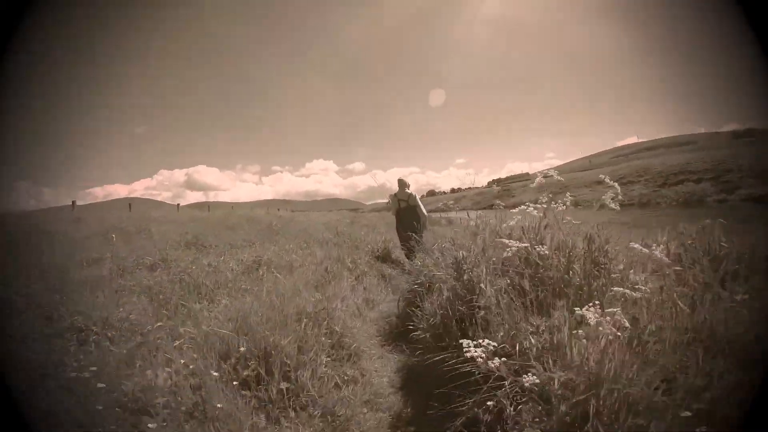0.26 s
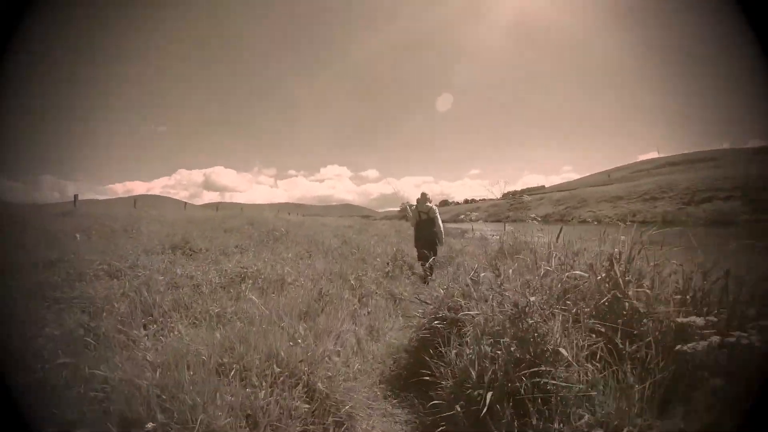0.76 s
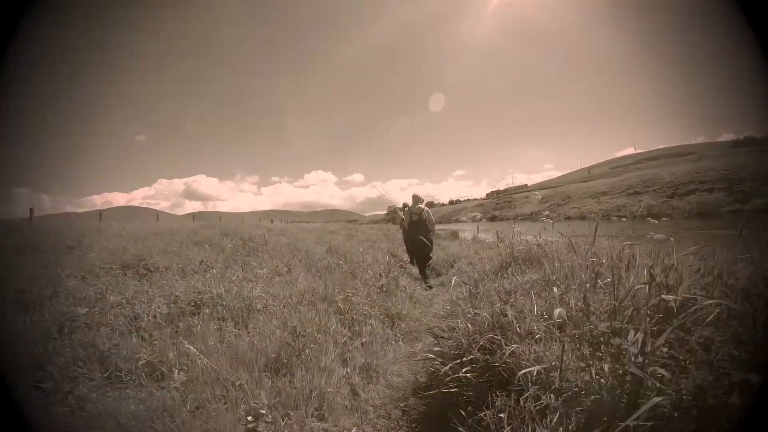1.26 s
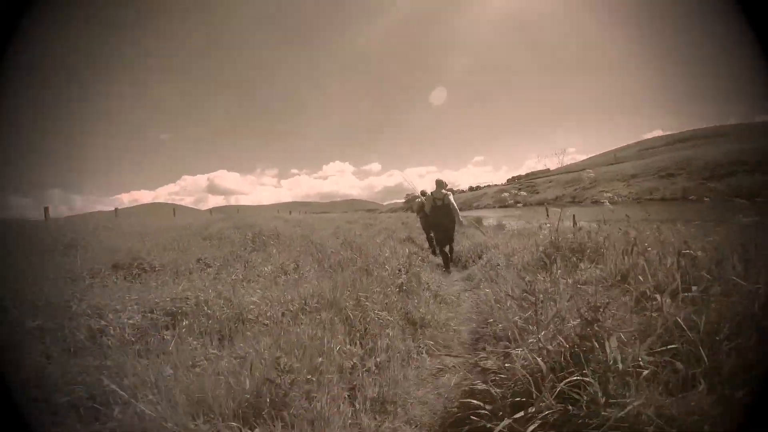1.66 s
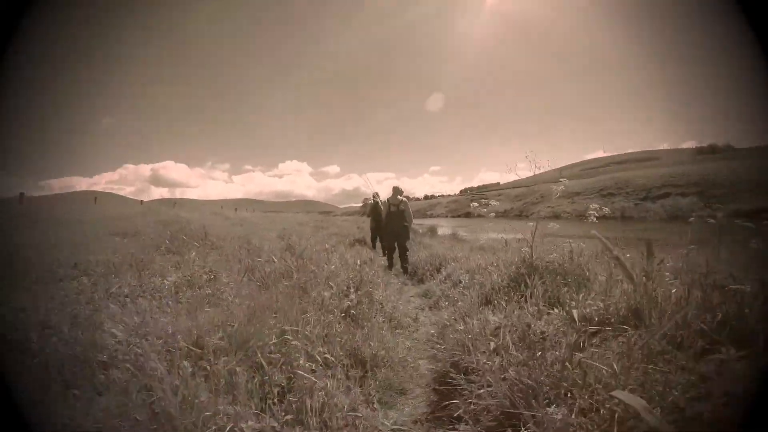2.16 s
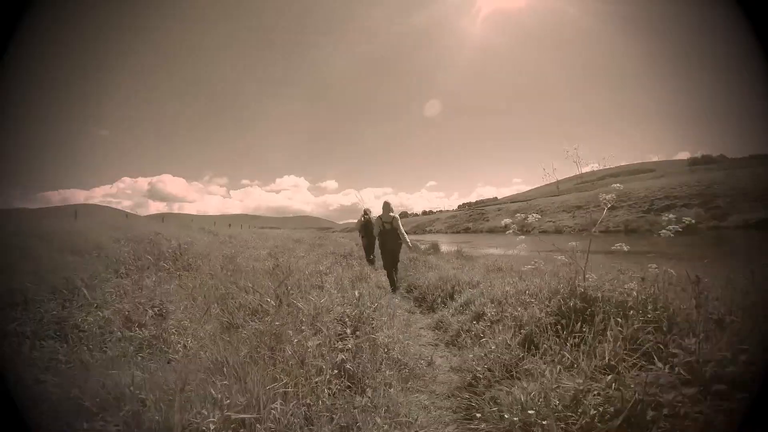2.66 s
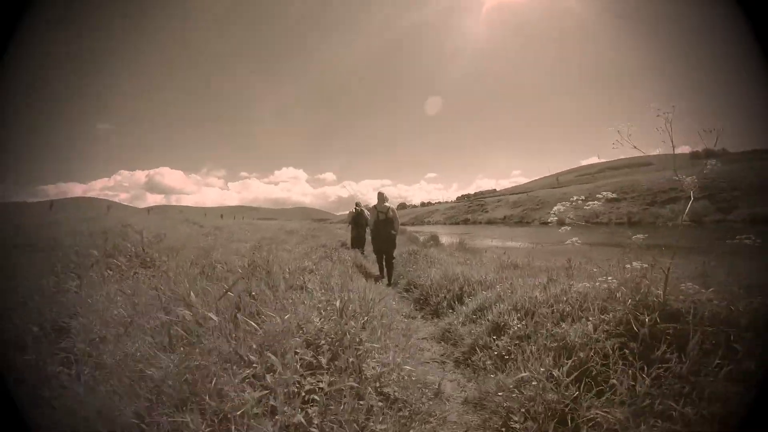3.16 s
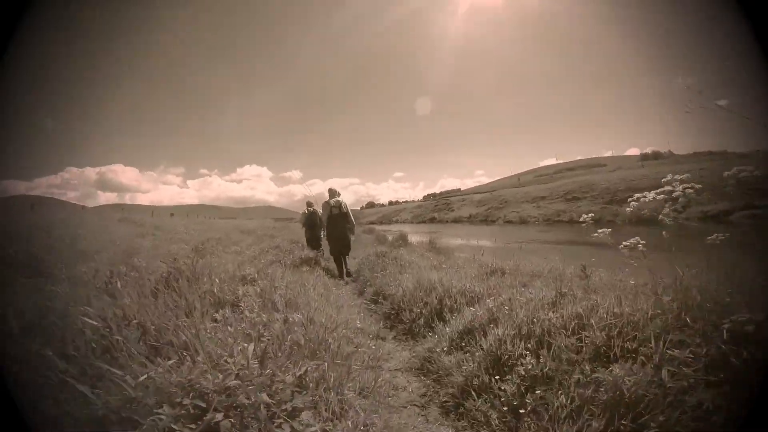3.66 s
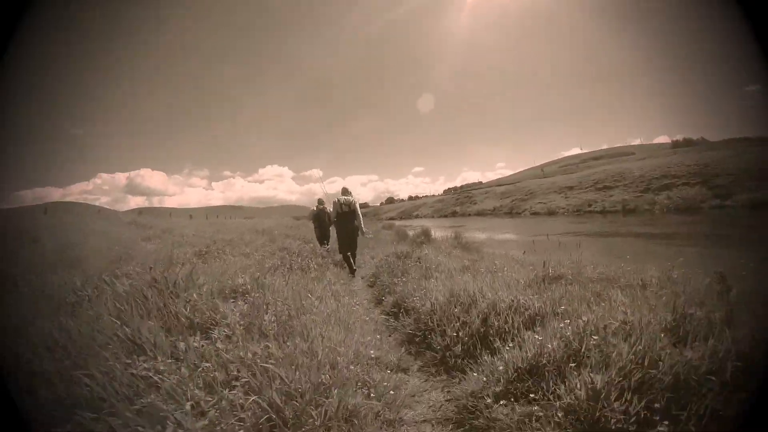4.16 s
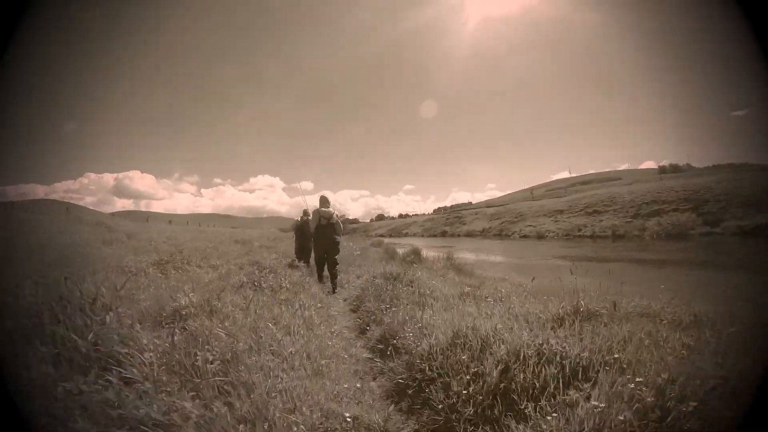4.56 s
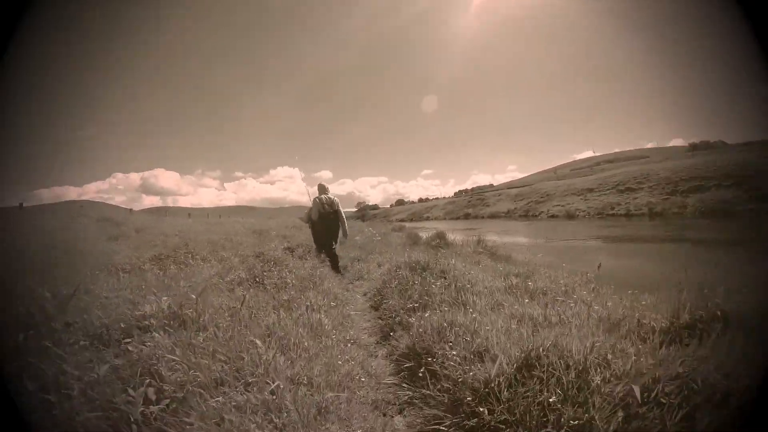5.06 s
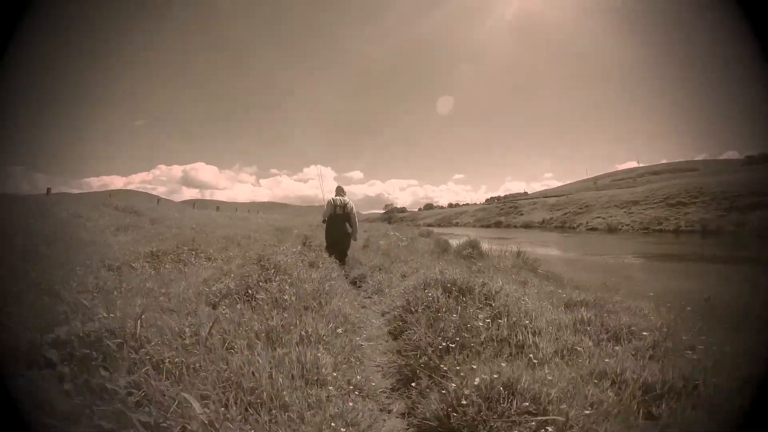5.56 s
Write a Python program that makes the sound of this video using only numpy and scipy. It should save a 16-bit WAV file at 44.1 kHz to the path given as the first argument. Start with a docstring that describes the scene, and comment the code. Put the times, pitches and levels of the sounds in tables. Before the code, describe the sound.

A handheld camera microphone moves along a grassy path. Deep light wind and hollow case bumps run under crisp grassy brushing and muffled footfalls. About nine brief, nearly pure bird whistles are spread through the six seconds, many opened by a quick peep, with only a faint open-air echo. Far birds are barely audible; a few taps and squeaks come early, over thin electronic hiss.

```python
"""Low wind rumble and soft bumps of a hand on a camera come first; then a step lands and a bird whistles.
The bird's near-pure tone flips from a low note to a high one and falls back, with faint echoes.
On this walk through long grass, grains of noise swish past the legs, and steps jolt the camera.
Knocks ring the case's modes, and rubs are noise with a squeak and a scuff in it.
Filtered noise rustles in the field, far birds are blurred tones, and the electronics hiss and whine."""
import sys
import numpy as np
from scipy import signal
from scipy.fft import rfft, irfft
from scipy.io import wavfile

SR = 44100
rng = np.random.default_rng(int(sys.argv[2]) if len(sys.argv) > 2 else 0)


def file_out(sig):
    """Save sig as 16-bit WAV at sys.argv[1]."""
    # one column per channel
    cols = np.atleast_2d(sig).T
    # limit, then scale
    lim = np.clip(cols, -1, 1)
    pcm = np.round(lim * 32767).astype(np.int16)
    wavfile.write(sys.argv[1], SR, pcm)


N = 256033
TIME = np.arange(N) / SR   # seconds

# the bird's low note (Hz) and how it curls upward just before the flip (Hz, s)
LOW_HZ, RISE_HZ, RISE_S = 2485, 309, 0.0112
# hollow ringing modes of the camera's case: pitch_hz [Hz], level_db [dB], t60_s [s to die away by 60 dB]
HOLLOW_MODES = [(220, -1, 0.088), (286, -39, 0.054), (122, -19, 0.055)]


def from_db(db):
    """Turn decibels into a plain factor."""
    return 10 ** (np.asarray(db) / 20)


def rms_one(x):
    """Scale a sound to an average (rms) strength of 1."""
    return x / np.sqrt(np.mean(x ** 2) + 1e-20)


def ease(t):
    """A smooth step from 0 to 1 around t = 0."""
    return .5 + .5 * np.tanh(t / 2)


def swell(s, length):
    """A bell-shaped rise and fall around a moment."""
    return np.exp(-.5 * ((TIME - s) / length) ** 2)


def swells(base, rows):
    """A base level with swells (start_s, level_db, length_s) on top, added in power."""
    bells = sum((from_db(db) * swell(s, length)) ** 2 for s, db, length in rows)
    return np.sqrt(base ** 2 + bells)


def level_curve(rows):
    """Join points (start_s, level_db) with straight lines, one value per sample."""
    s, db = np.transpose(rows)
    return np.interp(TIME, s, db)


def drift(rate_hz):
    """Slow random wander with a spread of 1: noise smoothed twice, at one fortieth of the sample rate."""
    pole = np.exp(-2 * np.pi * rate_hz * 40 / SR)
    noise = rng.standard_normal(N // 40 + 2002)
    slow = signal.lfilter([1], [1, -2 * pole, pole * pole], noise)[2000:]   # skip the filter's start-up
    return np.interp(np.arange(N) / 40, np.arange(len(slow)), rms_one(slow))


def colour(x, spectrum):
    """Shape x with a spectrum (pitch_hz, level_db) that falls steeply beyond its ends; rms 1."""
    hz, db = np.transpose(spectrum)
    f = np.maximum(np.fft.rfftfreq(N, 1 / SR), 1)
    skirts = np.minimum(f / hz[0], 1) ** 3 * np.minimum(hz[-1] / f, 1) ** 3
    shape = from_db(np.interp(np.log(f), np.log(hz), db))
    return rms_one(irfft(rfft(x) * skirts * shape, N))


def clicks(times, db):
    """Single impulses at the given moments."""
    out = np.zeros(N)
    out[(np.asarray(times) * SR).astype(int)] = from_db(db)
    return out


def ring(x, modes):
    """Each mode is a resonator that a click sets ringing at its own pitch, until it dies away."""
    out = 0
    for hz, db, t60 in modes:
        decay = from_db(-60 / (t60 * SR))
        turn = 2 * np.pi * hz / SR
        feedback = [1, -2 * decay * np.cos(turn), decay * decay]
        out = out + from_db(db) * signal.lfilter([0, np.sin(turn)], feedback, x + 1e-18)
    return out


def grains(per_s, spread_db):
    """Random tiny contacts, a few much stronger than the rest; rms 1."""
    strength_db = spread_db * np.minimum(rng.exponential(1, N), 5)
    sizes = from_db(strength_db) * rng.choice([-1, 1], N)
    return rms_one(sizes * (rng.random(N) < per_s / SR))


def bird(waver=0.0028, flutter_db=1.48, edge_s=0.00289, third_db=-20, leak=0.1, steady_db=-48):
    """A nearly pure whistle; the throat passes overtones well on the low notes and only leaks them higher up."""
    # whistles: flip_s, low_note_s, high_note_s, fall_s [s], top_hz, sag_hz, arch_hz [Hz],
    # low_db, high_db, late_fade_db (negative grows), fall_db [dB, before carry],
    # octave_start_db, octave_end_db [dB against the main tone, before the throat]
    whistle_rows = [(.554, 0.023, 0.044, 0.0073, 3280, 330, 108, -41.5, -50, 4, -55, -32, -18),
                    (0.947, .016, .078, 0.0071, 3287, 384, 12, -43.5, -50, -9, -48, -26, -13),
                    (1.550, 0.055, .071, .020, 3240, 270, 37, -57.5, -54.5, -6, -51.5, -15, -12),
                    (2.763, .018, 0.041, 0.01, 3310, 320, 96, -54, -57.5, -2, -63, -14, -3.5),
                    (3.179, 0.0079, 0.12, 0.0078, 3270, 45, -91, -49, -54.5, 1, -62, -16, -2),
                    (3.621, .012, 0.17, 0.018, 3180, 60, 37.5, -58, -65, 4, -53, -19, -22),
                    (4.096, 0.018, .096, 0.021, 3170, 212, 85, -59.5, -72, -20, -45.5, -5, -20),
                    (4.64, 0.019, 0.067, 0.0225, 3244, 342, 98, -49, -43, 19, -46, -6, -18),
                    (5.035, .030, 0.1, 0.088, 3150, 110, 49.5, -53, -53, 6, -59, -9.5, -8)]
    # quick peeps that open most calls: middle_s, length_s [s], top_hz [Hz],
    # level_db [dB, before carry], octave_db [dB against the main tone, before the throat]
    peep_rows = [(0.909, 0.032, 2650, -45.5, -26), (3.148, .028, 2900, -49.5, -25),
                 (3.569, 0.029, 2990, -52.5, -18), (4.003, .030, 3150, -59.5, -10),
                 (4.61, 0.0334, 2830, -47.5, -0.5), (4.986, 0.037, 3120, -48.5, -19)]
    # how well each pitch carries: pitch_hz [Hz], level_db [dB]
    carry = [(2400, -10), (2500, -5), (2650, 1), (2790, -7.5), (2920, -6), (3060, 0.5), (3300, 0.5)]
    octave_hz, octave_width_hz = 4820, 720   # where the throat lets the octave through
    out = np.zeros(N)
    wander = 1 + waver * drift(100)
    flutter = flutter_db * drift(72)
    notes = [whistle(*row) for row in whistle_rows] + [peep(*row) for row in peep_rows]
    for start, end, hz, db, octave_db in notes:
        gate = np.clip(np.minimum(TIME - start, end - TIME) / edge_s + .5, 0, 1)
        on = gate > 0
        hz = hz[on]
        db = db[on] + np.interp(hz, *np.transpose(carry))
        unsteady = np.clip((steady_db - db) / 5, 1, 4)   # soft notes flutter more
        phase = 2 * np.pi * np.cumsum(hz * wander[on]) / SR
        throat = leak + np.exp(-.5 * ((2 * hz - octave_hz) / octave_width_hz) ** 4)
        overtones = np.sin(2 * phase) + from_db(third_db) * np.sin(3 * phase)
        voice = np.sin(phase) + from_db(octave_db[on]) * throat * overtones
        out[on] += np.sqrt(2) * gate[on] * from_db(db + unsteady * flutter[on]) * voice
    return out


def whistle(flip, low_s, high_s, fall_s, top_hz, sag_hz, arch_hz, low_db, high_db, fade_db, fall_db,
            opening_db, closing_db):
    """A low note flips up, sags along an arch and falls back: start, end, pitch, level and octave level."""
    flip_s, slide_s = .0007, 0.0038   # an abrupt flip and a slower slide back
    end_hz, sink_hz = 2726, 230       # the slide lands here and sinks on by this much
    fade_shape = 4.4                  # the high note holds its level, then changes late
    fade_db_per_s = 110               # dying away after the slide
    t = TIME - flip
    held = np.clip(t / high_s, 0, 1)
    falling_s = np.clip(t - high_s, 0, fall_s)
    up, down = ease(t / flip_s), ease((t - high_s) / slide_s)
    low, high = 1 - up, up - down   # how much of each note sounds
    low_hz = LOW_HZ + RISE_HZ * np.exp(np.minimum(t, 0) / RISE_S)
    high_hz = top_hz - sag_hz * held + arch_hz * np.sin(np.pi * held)
    last_hz = end_hz - sink_hz * falling_s / fall_s
    hz = low * low_hz + high * high_hz + down * last_hz
    held_db = high_db - fade_db * held ** fade_shape
    last_db = fall_db - fade_db_per_s * falling_s
    db = low * low_db + high * held_db + down * last_db
    octave_db = opening_db + (closing_db - opening_db) * held
    return flip - low_s, flip + high_s + fall_s, hz, db, octave_db


def peep(s, length, top_hz, db, octave_db, flatness=3.3, width=.3, edge_db=5.0):
    """A quick hop from the low note and back, loudest on top: start, end, pitch, level and octave level."""
    hop = np.exp(-np.abs((TIME - s) / (width * length)) ** flatness)
    hz = LOW_HZ + (top_hz - LOW_HZ) * hop
    return s - length / 2, s + length / 2, hz, db - edge_db * (1 - hop), np.full(N, octave_db)


def meadow(x, scatter_db=-19, t60=0.49):
    """A few faint delayed copies and a thin, dying noise tail scattered by the hillside."""
    # reflections from the ground and the slope: delay_s [s], level_db [dB]
    echo_rows = [(0.024, -29), (.047, -22), (.074, -42), (.112, -57)]
    echoes = sum(from_db(db) * np.interp(TIME - delay, TIME, x, left=0) for delay, db in echo_rows)
    tail = rng.standard_normal(SR) * from_db(-60 * TIME[:SR] / t60)
    scattered = signal.fftconvolve(x, tail / np.linalg.norm(tail))[:N]
    return x + echoes + from_db(scatter_db) * scattered


def footfalls(sway_hz=14, sway_s=0.036, lag_s=0.019, crunch_s=0.025):
    """A step thuds through the camera's case; just after, the camera sways and the turf is pressed."""
    # footfalls: start_s [s], sway_db, thud_db (strength of the click), crunch_db [dB]
    step_rows = [(.497, -27.5, -38, -56), (1.669, -40, -52, -68), (2.31, -60, -42.5, -85),
                 (2.945, -23.5, -31, -66), (3.472, -32.5, -52, -56.5), (4.085, -28, -30, -58.5),
                 (4.598, -36, -66, -63), (5.189, -26, -37, -60.5)]
    turf = colour(grains(per_s=3500, spread_db=5.5),
                  [(120, 18), (300, 11.0), (500, 8.5), (900, 17.5), (1400, -36), (3000, 0.5)])
    out = np.zeros(N)
    for s, sway_db, _, crunch_db in step_rows:
        sway = np.cos(2 * np.pi * sway_hz * (TIME - s - lag_s))
        out += from_db(sway_db) * swell(s + lag_s, sway_s) * sway
        out += from_db(crunch_db) * swell(s + lag_s, crunch_s) * turf
    s, _, thud_db, _ = np.transpose(step_rows)
    return out + ring(clicks(s, thud_db), HOLLOW_MODES)


def grass(swish_db=-3.5, flick_db=1.5, clump_db=1.8):
    """Blades brush the legs in dense clumps that swell with each sweep; stems flick past more coarsely."""
    # sweeps of the legs: middle_s [s], level_db [dB, before swish_db and clumps], length_s [s]
    sweep_rows = [(.34, -58, 0.047), (0.617, -58, 0.059), (0.966, -65, 0.061), (1.06, -55.5, 0.02),
                  (1.51, -62.5, .05), (1.82, -62.5, 0.028), (2.555, -60, 0.095), (2.686, -55, 0.014),
                  (2.957, -57.5, 0.0068), (3.166, -61.5, 0.12), (3.745, -64, 0.069), (3.865, -57.5, 0.014),
                  (4.064, -61, 0.028), (4.162, -60, .012), (4.388, -58.5, 0.046), (4.507, -58.5, 0.021),
                  (5.07, -62.5, 0.086), (5.34, -61, .03), (5.613, -57, 0.031), (5.705, -60.5, 0.026)]
    # stems that flick past: middle_s [s], level_db [dB, before flick_db], length_s [s]
    flick_rows = [(.61, -84, 0.013), (0.989, -64, 0.0059), (1.038, -60, 0.052), (1.544, -63.5, 0.016),
                  (1.83, -86, .02), (2.394, -61.5, 0.0035), (2.683, -56.5, 0.0087), (3.841, -62, 0.018),
                  (5.122, -58.5, 0.012), (5.322, -77, 0.017), (5.674, -61, 0.017)]
    # tone of the blades: pitch_hz [Hz], level_db [dB]
    blade_colour = [(1200, -7.5), (1700, -6.5), (2500, 7.5), (3200, -3.5), (4150, 5), (4900, -5.5),
                    (5700, 1), (6900, -5.5), (7500, -5), (9000, -12), (11000, -9.5), (15000, -20)]
    sweep = swells(from_db(-65.5), sweep_rows)   # the base is grass brushing between the sweeps
    clumps = from_db(swish_db + clump_db * drift(35))
    blades = colour(grains(per_s=9800, spread_db=2.5), blade_colour) * sweep * clumps
    stems = colour(grains(per_s=9900, spread_db=4.0),
                   [(1500, -42), (3200, 5.5), (4150, 17.5), (4900, -1), (5900, 5.5), (8000, -19.5), (14000, -9)])
    flicking = sum(from_db(db) * swell(s, length) for s, db, length in flick_rows)
    return blades + from_db(flick_db) * stems * flicking


def knocks(chatter=0.058, chatter_s=0.0024, soft_hz=2600):
    """Something loose taps the case, chatters for a moment and sets its modes ringing."""
    # knocks and ticks on the case: start_s [s], hollow_db, click_db, rattle_db [dB, strength of the click]
    knock_rows = [(.522, -53, -48, -44.5), (.887, -28.5, -30.5, -44.5), (0.904, -31.5, -46, -57),
                  (1.031, -45, -27, -44.5), (1.044, -47, -57, -45), (3.031, -43, -60, -47),
                  (4.058, -64, -49, -44.5), (4.15, -65, -55, -57)]
    # clicking, then rattling modes of the case: pitch_hz [Hz], level_db [dB], t60_s [s]
    click_modes = [(2270, 0, 0.017), (2620, -17, 0.028), (4150, -29, .02)]
    rattle_modes = [(647, -1.5, 0.016), (1013, -0.5, 0.016), (1640, -1.5, 0.0067)]
    s, hollow_db, click_db, rattle_db = np.transpose(knock_rows)
    t = TIME[:SR // 10]
    contact = chatter * rng.standard_normal(len(t)) * np.exp(-t / chatter_s)
    contact[0] = 1   # the first tap
    soft = signal.butter(4, soft_hz, fs=SR, output="sos")   # a soft touch has little treble
    contact = signal.sosfilt(soft, contact)
    groups = [(hollow_db, HOLLOW_MODES), (click_db, click_modes), (rattle_db, rattle_modes)]
    body = sum(ring(clicks(s, db), modes) for db, modes in groups)
    return signal.fftconvolve(body, contact)[:N]


def bumps(press_s=0.0035):
    """The soft hand that holds the camera presses slowly, so only the low, hollow modes of the case ring."""
    # bumps of the hand: start_s [s], level_db [dB, strength of the push]
    bump_rows = [(0.01, -43), (0.096, -37), (.197, -36), (.24, -46), (.29, -39), (.572, -46), (0.8, -43),
                 (.975, -42), (1.204, -42.5), (1.32, -42.5), (1.729, -39), (2.444, -44), (2.504, -40.5),
                 (2.679, -39), (2.747, -36), (2.82, -40.5), (2.972, -38), (3.065, -41), (4.25, -48),
                 (4.49, -38.5), (5.249, -38.5), (5.331, -49)]
    s, db = np.transpose(bump_rows)
    push = np.hanning(int(press_s * SR))
    return signal.fftconvolve(ring(clicks(s, db), HOLLOW_MODES), push / push.sum())[:N]


def rubs():
    """Uneven slips of skin on plastic make the case squeak and scuff."""
    # rubs of the hand: middle_s [s], squeak_db, low_scuff_db [dB], length_s [s]
    rub_rows = [(0.825, -61, -80, 0.034), (0.887, -47.5, -58, 0.0053), (0.927, -52, -66, 0.023),
                (1.052, -76, -47, 0.0081), (3.753, -52, -69, 0.005)]
    slips = grains(per_s=1700, spread_db=4.5)
    squeak = colour(slips, [(1200, -12), (1800, -6), (2280, 5.0), (2650, 4), (3200, -43.0)])
    scuff = colour(slips, [(200, 10), (350, -3), (560, 12), (800, -15), (1500, -6)])
    out = np.zeros(N)
    for s, squeak_db, scuff_db, length in rub_rows:
        out += swell(s, length) * (from_db(squeak_db) * squeak + from_db(scuff_db) * scuff)
    return out


def wind(mean_db=-49.0, follow=0.51, gust_db=1.0):
    """Light wind on the microphone: low noise that wanders in level, with brief buffets on top."""
    # rise and fall of the rumble: start_s [s], level_db [dB; only its swing counts, scaled by follow]
    breeze_rows = [(0.0, -48), (1.06, -56.5), (1.76, -58), (2.08, -58), (2.49, -53.5), (2.81, -47.5),
                   (3.65, -54), (3.93, -55), (4.33, -58.5), (4.8, -52), (5.25, -57), (5.8, -54.5)]
    # brief buffets: middle_s [s], level_db [dB], length_s [s]
    buffet_rows = [(0.033, -39.5, 0.054), (.21, -41, .03), (.53, -40, 0.066), (0.896, -42, 0.017),
                   (1.004, -35.5, 0.026), (1.175, -44, 0.052), (1.337, -40, 0.02), (2.328, -44, 0.068),
                   (2.705, -45.5, 0.045), (3.062, -40, .025), (3.3, -50, 0.038), (3.582, -45, 0.065),
                   (4.23, -41, 0.055), (4.397, -43.5, 0.063), (5.084, -44, 0.11), (5.285, -45.5, 0.036),
                   (5.463, -47.5, 0.093)]
    # tone of the rumble: pitch_hz [Hz], level_db [dB]
    rumble_colour = [(12, 2.5), (25, -5), (40, -3.5), (56, -1), (70, -7), (90, -15), (130, -29),
                     (200, -45.5), (400, -44)]
    curve_db = level_curve(breeze_rows)
    breeze_db = mean_db + follow * (curve_db - curve_db.mean()) + gust_db * drift(3.1)
    return swells(from_db(breeze_db), buffet_rows) * colour(rng.standard_normal(N), rumble_colour)


def case_hum(mean_db=-62, follow=1.2, fidget_db=0.5):
    """The hollow case hums in the hand: noise in a low band whose level follows the grip."""
    # rise and fall with the grip: start_s [s], level_db [dB; only its swing counts, scaled by follow]
    grip_rows = [(0.0, -52.5), (0.1, -65.5), (0.27, -66), (0.76, -65), (1.0, -61), (1.24, -63),
                 (1.44, -66.5), (2.24, -67.5), (2.42, -62.5), (3.81, -70.5), (4.15, -63.5), (4.43, -69),
                 (5.17, -67.5), (5.8, -66)]
    curve_db = level_curve(grip_rows)
    hum_db = mean_db + follow * (curve_db - curve_db.mean()) + fidget_db * drift(12)
    hum = colour(rng.standard_normal(N),
                 [(130, 2.5), (185, 0.0), (218, 4), (245, -5.0), (290, -13), (450, -48.0)])
    return from_db(hum_db) * hum


def field(mean_db=-60.0, stir_db=1.1):
    """The wind rustles the field: soft coloured noise that stirs slowly in level."""
    # tone of the rustle: pitch_hz [Hz], level_db [dB]
    rustle_colour = [(150, -29.5), (250, -2.5), (276, -1), (504, -4.5), (568, -4.5), (794, -6.5),
                     (884, -6.5), (1100, -9.5), (1420, -5), (1730, -5), (1940, -11.5), (2570, -11),
                     (3300, -15), (4290, -43), (7260, -120)]
    return from_db(mean_db + stir_db * drift(5.6)) * colour(rng.standard_normal(N), rustle_colour)


def far_birds(blur_hz=85, droop=.022):
    """Each far call arrives as a wavering narrow band that arches gently in pitch."""
    # distant calls, blurred by the way: middle_s [s], top_hz [Hz], level_db [dB], length_s [s]
    call_rows = [(0.116, 2630, -60, 0.0099), (0.305, 1412, -62, 0.11), (0.346, 2620, -64, 0.031),
                 (0.624, 2640, -59.5, 0.018), (1.242, 2570, -61.5, 0.017), (1.68, 2630, -64, 0.0093),
                 (2.548, 1763, -64.5, 0.075), (3.081, 2680, -62, 0.022), (3.475, 1990, -60.5, 0.09),
                 (3.672, 2650, -59, 0.018), (4.243, 1730, -60.5, 0.034), (5.168, 3070, -63, 0.017),
                 (5.592, 3970, -52, 0.008)]
    blur = drift(blur_hz) + 1j * drift(blur_hz)   # random strength and phase
    out = np.zeros(N)
    for s, hz, db, length in call_rows:
        near = np.abs(TIME - s) < 4 * length
        pitch = hz * (1 - droop * ((TIME[near] - s) / length) ** 2)
        tone = np.exp(2j * np.pi * np.cumsum(pitch) / SR)
        out[near] += from_db(db) * swell(s, length)[near] * np.real(blur[near] * tone)
    return out


def electronics(hiss_db=-71, waver_hz=3, jitter=0.3, jitter_hz=110):
    """Steady hiss with thin whining tones that waver together, each a little rough from its own jitter."""
    # whining tones: pitch_hz [Hz], level_db [dB]
    whine_rows = [(5845, -78.5), (5874, -84.5), (8781, -91), (11688, -85.5), (11719, -83.5), (14626, -82)]
    # tone of the hiss: pitch_hz [Hz], level_db [dB]
    hiss_colour = [(2500, -17), (4000, -1), (6000, -4), (8000, -10.5), (9700, -9), (10400, -11),
                   (11050, -9.5), (11290, -1), (11500, -11.5), (13000, -10), (15000, -7)]
    wander = np.cumsum(waver_hz * drift(12.3)) / SR   # in turns of the lowest tone
    lowest_hz = whine_rows[0][0]
    tones = np.zeros(N)
    for hz, db in whine_rows:
        phase = 2 * np.pi * (hz * TIME + wander * hz / lowest_hz) + jitter * drift(jitter_hz)
        tones += np.sqrt(2) * from_db(db) * np.sin(phase)
    return tones + from_db(hiss_db) * colour(rng.standard_normal(N), hiss_colour)


def scene():
    """Everything added up at the one microphone; only the near bird gets echoes."""
    walking = footfalls() + grass()
    handling = knocks() + bumps() + rubs()
    background = wind() + case_hum() + field() + far_birds() + electronics()
    return (meadow(bird()) + walking + handling + background)[None]


def record(dry):
    """A very steep filter removes the treble above its cutoff."""
    cutoff_hz = 14950
    return signal.sosfilt(signal.ellip(12, .1, 80, cutoff_hz, fs=SR, output="sos"), dry)


dry = scene()
out = record(dry)
file_out(out)
```